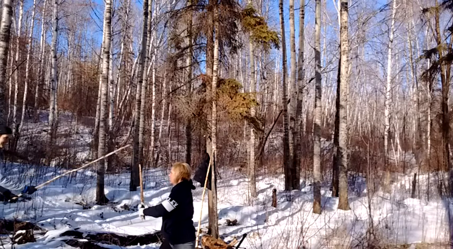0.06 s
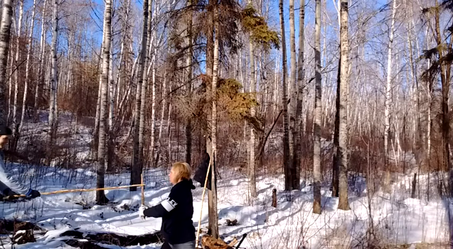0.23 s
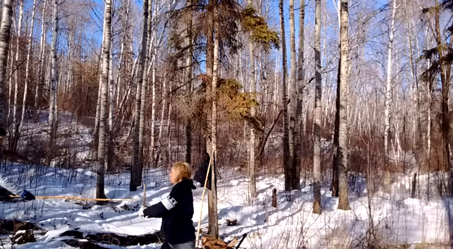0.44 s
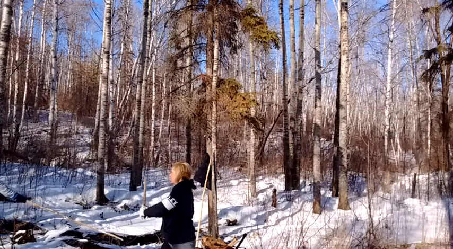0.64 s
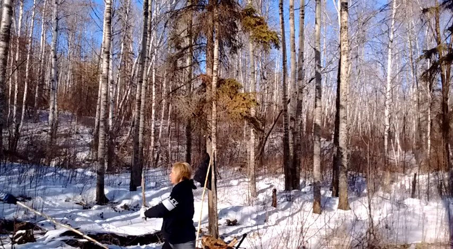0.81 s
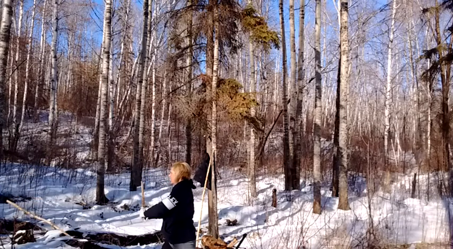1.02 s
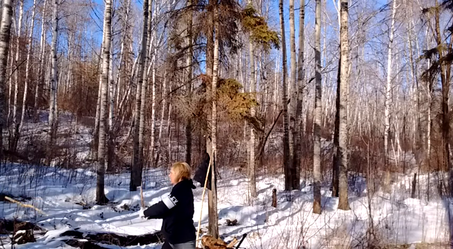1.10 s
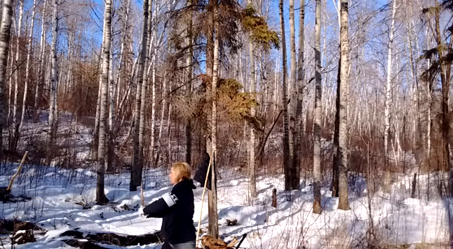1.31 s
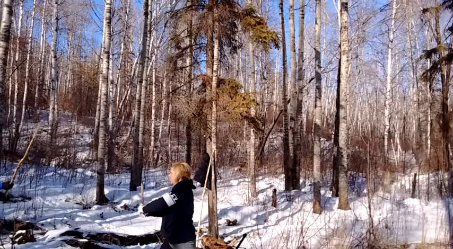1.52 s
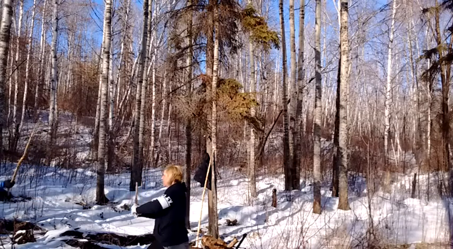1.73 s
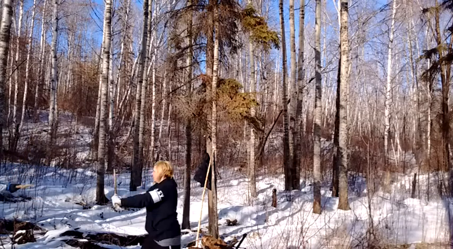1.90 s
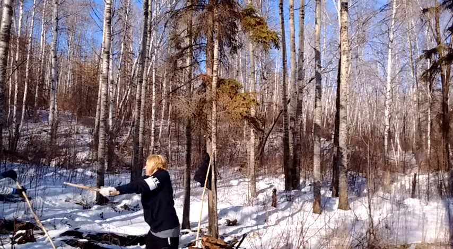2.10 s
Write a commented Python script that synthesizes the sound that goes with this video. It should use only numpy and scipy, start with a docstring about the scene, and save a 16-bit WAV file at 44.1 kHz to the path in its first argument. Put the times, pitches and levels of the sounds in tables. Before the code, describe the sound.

Wooden sticks smack sharply together once, rattle faintly, then soft snow crunches and cloth rustles outdoors

```python
"""One hard clack of wooden sticks, then a light chatter: two people spar in a snowy wood.
Each contact is a pair of band-limited pushes that excite the sticks' bending modes, with a noisy crack.
Trunks scatter the sound back as decaying noise; a whoosh leads the blow, jackets swish and snow crunches
in shaped noise, over a distant rumble, a faint hiss and an engine drone made of narrow noise bands.
The clack drives the recorder's gain control down, and the background creeps back."""
import sys
import numpy as np
from scipy import signal
from scipy.fft import rfft, irfft
from scipy.io import wavfile
from scipy.ndimage import uniform_filter1d, minimum_filter1d

SR = 44100
rng = np.random.default_rng(int(sys.argv[2]) if len(sys.argv) > 2 else 0)


def transcribe(u):
    """Save the signal u as a 16-bit wav file named by the first command-line argument.

    u: samples, shape (n,) or (channels, n), limited to [-1, 1]; the rate is SR.
    q: integer samples, one column per channel.
    """
    v = np.clip(np.atleast_2d(u).T, -1, 1)
    q = np.round(v * 32767).astype(np.int16)
    wavfile.write(sys.argv[1], SR, q)


N = 94815  # length in samples

# Levels are relative within their layer; left-right levels are positive towards the left.
# spectrum of distant rumble and hiss: (frequency [Hz], spectral density [dB])
AIR_SPECTRUM = [(25, -43), (50, -12), (110, -5.5), (200, 0), (320, 1.5), (480, -5), (700, -8.5),
                (1100, -16), (2100, -23.5), (2700, -28), (3100, -35.5), (3700, -29), (4800, -29),
                (5700, -35), (6400, -43), (7100, -32), (7900, -30.5), (10000, -34.5), (16000, -35)]
# stereo balance of the air: (frequency [Hz], left-right level [dB])
AIR_BALANCE = [(30, -31), (80, 9), (200, 11.5), (400, 2.5), (1000, 1.5), (3000, 1.5), (12000, 0)]
# likeness of the air at the two microphones: (frequency [Hz], correlation [1])
AIR_CORRELATION = [(30, 0.12), (120, 0.82), (400, 0.72), (1500, 0.7), (4000, 0.067), (15000, 0.073)]
AIR_DB = -41.5

# tones of a far-off engine: (frequency [Hz], level at the start [dB], growth [dB/s])
DRONE_TONES = [(66.7, -68, 0), (102.6, -67, 6), (135.3, -57, 1), (162, -59, -5), (200.5, -48.5, -4.5),
               (274.6, -57, 0), (302.7, -61.5, 3.5), (445.6, -59.5, 1)]
DRONE_WIDTH_HZ, DRONE_PAN_DB = 3.94, 12.5

# width of sound from all round, close microphones hearing its bass alike: (frequency [Hz], side level [dB])
DIFFUSE_WIDTH = [(200, -5), (800, -1), (1500, -12), (2200, -4), (2800, 1)]
# colour of the echoes from the trunks: (frequency [Hz], level [dB])
TRUNK_SPECTRUM = [(60, -30), (300, -26), (900, 1.5), (1300, -4.5), (1700, 7.5), (2200, 2.5), (3000, 8),
                  (4000, 9), (5000, 14), (6400, 10.5), (8000, 5), (15000, 5)]
# echoes of the nearest clumps of trees: (delay [s], half length [s], level against the even wood [dB])
CLUMPS = [(0.02, 0.0072, 8.5), (0.055, 0.012, -1)]
WOOD_DB, WOOD_T60_S, TRUNK_SPREAD_DB = -23.5, 0.95, 6.5
NEAR_DB, NEAR_T60_S = -19.5, .045

# swishes of jackets and sliding feet: (time of the top [s], half length [s], level [dB])
SWISHES = [(0.093, 0.3, -56.5), (1.787, 0.045, -47), (1.793, 0.0045, -51), (2.093, 0.18, -49)]
# colour of the swishes: (frequency [Hz], level [dB])
SWISH_SPECTRUM = [(300, 17.5), (1000, 8), (2000, 9.5), (3100, -3.5), (4600, 3.5), (6400, -7.5),
                  (8000, -1.5), (12000, -5.5), (16000, -9)]
SWISH_GRAIN_DB = 3.5

# crunches of snow crust:
# (time [s], level [dB], t60 [s], left-right level [dB], ring frequency [Hz], ring level [dB])
CRUNCHES = [(1.084, -54.5, 0.017, -3, 9400, 10), (1.2332, -31.5, 0.013, 15, 1390, 11),
            (1.237, -36, 0.021, -3, 9550, -3), (1.245, -45.5, 0.049, -1, 3970, 0),
            (1.261, -44.5, 0.018, -3, 9600, 3), (2.0175, -46, 0.039, 11, 8500, 2),
            (2.0343, -34, 0.0092, 5, 2380, 8), (2.035, -42, 0.032, -8, 8240, 14),
            (2.066, -44, 0.12, 1.5, 1790, 7), (2.145, -43.5, 0.067, 2.5, 5040, 11.5)]
# colour of the crunches: (frequency [Hz], level [dB])
CRUNCH_SPECTRUM = [(400, -14), (1400, 1), (2400, -0.5), (3100, -3.5), (4000, 6.5), (5100, 1.5),
                   (6400, -6.5), (8000, 5.5), (11000, 0), (15500, -7)]
CRUNCH_RISE_S, GRAIN_DB, CRUST_Q = 0.00068, 6, 6.2

# the swing before the blow: (time of the top [s], half length [s], level [dB])
SWING = (0.18, 0.037, -54.5)
# colour of the swing: (frequency [Hz], level [dB])
WHOOSH_SPECTRUM = [(60, -42), (150, -4), (260, 3), (450, 1), (900, -16), (3000, -61.5)]

# blows, one hard clack and then a light chatter:
# (time [s], level [dB], bass limit [Hz], treble limit [Hz], crack level [dB], crack t60 [s])
BLOWS = [(0.2212, 35, 100, 3410, -14, 0.014), (0.3552, 0, 1660, 3000, -3.5, 0.0082),
         (0.3569, 8, 3570, 6200, -10, 0.021), (0.3609, 2.5, 1850, 4600, -14, 0.019),
         (0.3644, 4, 1670, 2600, -14, 0.09)]
# dry snap that a stick radiates on contact: (frequency [Hz], level [dB])
SNAP_SPECTRUM = [(40, -73), (200, -30), (400, -22), (560, -4.5), (800, -16), (950, -1.5), (1250, -2),
                 (2100, -2.5), (2700, -18), (3300, -15), (4500, -4.5), (8000, -15), (15000, -41)]
# bending modes of the two sticks: (frequency [Hz], level [dB], t60 [s])
STICK_MODES = [(535, -22, .04), (955, -17, 0.1), (1152, -8.5, 0.045), (1390, -11, 0.03),
               (1617, -2.5, 0.053), (1844, -5.5, 0.056), (2003, -7, 0.041), (2300, -11, 0.032),
               (2650, -22, .06), (2930, -16, 0.039), (3580, -21.5, 0.035), (4500, -7, 0.04),
               (5200, -16, 0.06)]
# colour of the splintery crack: (frequency [Hz], level [dB])
CRACK_SPECTRUM = [(60, -33), (500, -3.5), (2000, 7.5), (3100, -2.5), (4600, 1.5), (6400, -12.5), (8000, 2),
                  (12000, -14.5), (16000, -24)]
# stereo balance of the sticks: (frequency [Hz], left-right level [dB])
STICK_BALANCE = [(500, 0), (1150, 4.5), (1700, 2.5), (2400, -1.5), (3300, 6), (5000, -2)]
RING_DB, CRACK_DB = -42, -5
REBOUND_S, REBOUND_DB = .00089, -6  # the second contact within each blow
RIGHT_LAG_S = .00009  # the left microphone hears the sticks first

# the recorder's stereo picture, wide in some bands and narrow in others: (frequency [Hz], side level [dB])
STEREO_WIDTH = [(1900, 0), (2400, 1.5), (3050, 10), (3600, 5), (4200, -2.5), (4850, -6), (5500, -2),
                (6300, 11), (7200, 0), (8200, -3), (10500, 1.5), (13000, 0)]
CEILING, RECOVER_DB_PER_S, TOP_HZ = 1, 11.5, 15700


def undb(db):
    """Level to amplitude: 20 dB is a factor of ten."""
    return 10 ** (np.asarray(db) / 20)


def unit(x):
    """Normalisation to a root-mean-square of 1."""
    return x / np.sqrt(np.mean(x ** 2))


def pan(db):
    """Intensity stereophony: half the level difference on each side, positive to the left."""
    return undb(np.array([[1], [-1]]) * db / 2)


def curve(points):
    """Interpolation of (Hz, value) points along log frequency, at every bin of a 2N spectrum."""
    hz, value = np.array(points, float).T
    bins_hz = np.fft.rfftfreq(2 * N, 1 / SR) + 1e-9
    return np.interp(np.log(bins_hz), np.log(hz), value)


def colour(x, points):
    """Minimum-phase filtering: a folded cepstrum makes the (Hz, dB) response causal."""
    cepstrum = irfft(np.log(undb(curve(points))))
    cepstrum[1:N] *= 2
    cepstrum[N + 1:] = 0
    response = np.exp(rfft(cepstrum))
    return irfft(rfft(x, 2 * N) * response)[..., :N]


def convolve(x, response):
    """Linear superposition: every sample launches a copy of the response."""
    return irfft(rfft(x, 2 * N) * rfft(response, 2 * N))[..., :N]


def fade(start, t60):
    """Exponential decay, falling 60 dB in t60 seconds from the start on."""
    age = np.arange(N) / SR - start
    return (age >= 0) * np.exp(-np.log(1000) * np.maximum(age, 0) / t60)


def swell(top, half, db):
    """Gaussian envelope: a smooth rise and fall around a moment."""
    return undb(db) * np.exp(-((np.arange(N) / SR - top) / half) ** 2 / 2)


def burst(start, t60):
    """Incoherent decay: noise drawn separately for each microphone, with a mean energy of 1."""
    return unit(rng.standard_normal((2, N)) * fade(start, t60)) / np.sqrt(N)


def widen(x, points):
    """Mid-side decomposition: the left-right difference is scaled by (Hz, dB) points."""
    mid = (x[0] + x[1]) / 2
    side = colour((x[0] - x[1]) / 2, points)
    return np.array([mid + side, mid - side])


def air():
    """Partial coherence: shared and separate noise mix from an alike rumble to a diffuse hiss."""
    shared = rfft(rng.standard_normal(2 * N))
    own = rfft(rng.standard_normal((2, 2 * N)))
    correlation = np.clip(curve(AIR_CORRELATION), 0, 1)
    both = np.sqrt(correlation) * shared + np.sqrt(1 - correlation) * own
    both = both * undb(curve(AIR_SPECTRUM)) * pan(curve(AIR_BALANCE))
    return undb(AIR_DB) * unit(irfft(both)[:, :N])


def drone():
    """Line broadening: engine tones waver on their long way through the trees, as narrow noise bands."""
    t, f = np.arange(N) / SR, np.fft.rfftfreq(N, 1 / SR)
    out = 0
    for hz, db, growth in DRONE_TONES:
        line = rfft(rng.standard_normal(N)) / (1 + ((f - hz) / DRONE_WIDTH_HZ) ** 2)
        out = out + undb(db + growth * t) * unit(irfft(line, N))
    return out * pan(DRONE_PAN_DB)


def forest(x):
    """Multiple scattering: nearby ground and bodies answer first, then clumps and countless trunks."""
    density = fade(.014, WOOD_T60_S) + sum(swell(*clump) for clump in CLUMPS)
    echoes = density * rng.standard_normal((2, N))
    spread = undb(TRUNK_SPREAD_DB * rng.standard_normal((2, N)))  # some trunks answer louder
    trunks = unit(echoes * spread) / np.sqrt(N)
    near_echo = burst(0.0059, NEAR_T60_S)
    response = undb(WOOD_DB) * colour(trunks, TRUNK_SPECTRUM) + undb(NEAR_DB) * near_echo
    return widen(convolve(x, response), DIFFUSE_WIDTH)


def jackets():
    """Friction noise: rubbing cloth and sliding feet give soft, grainy swells."""
    smooth = unit(uniform_filter1d(rng.standard_normal(N), size=60))
    grain = undb(SWISH_GRAIN_DB * smooth)
    rub = colour(grain * rng.standard_normal((2, N)), SWISH_SPECTRUM)
    return sum(swell(*swish) for swish in SWISHES) * unit(widen(rub, DIFFUSE_WIDTH))


def snow():
    """Brittle fracture: crust breaks in quick showers of tiny grains, each shower with its own resonance."""
    t, out = np.arange(N) / SR, 0
    grain_gain = undb(GRAIN_DB * rng.standard_normal(N))
    grains = unit(rng.standard_normal((2, N)) * grain_gain)
    for start, db, t60, pan_db, ring_hz, ring_db in CRUNCHES:
        rise = np.clip((t - start) / CRUNCH_RISE_S + 1, 0, 1)
        shower = grains * rise * fade(start - CRUNCH_RISE_S, t60)
        resonator = signal.iirpeak(ring_hz, CRUST_Q, fs=SR)
        ring = signal.lfilter(*resonator, shower + 1e-18)  # the offset avoids denormal numbers
        out = out + undb(db) * pan(pan_db) * (shower + undb(ring_db) * ring)
    return colour(out, CRUNCH_SPECTRUM)


def swing():
    """Aerodynamic noise: the stick pushes the air aside with a low whoosh, slightly to the right."""
    whoosh = unit(colour(rng.standard_normal(N), WHOOSH_SPECTRUM))
    return swell(*SWING) * whoosh * pan(db=-1)


def sticks():
    """Impact excitation: two pushes within a millisecond snap and ring the modes; the second cracks the bark."""
    t, f = np.arange(N) / SR, np.fft.rfftfreq(2 * N, 1 / SR)

    def late(seconds):
        """Pure delay: a phase that turns in proportion to frequency."""
        return np.exp(-2j * np.pi * f * seconds)

    push, crack = 0, 0
    rebound = 1 + undb(REBOUND_DB) * late(REBOUND_S)
    for start, db, low_hz, top_hz, crack_db, crack_t60 in BLOWS:
        contact = f ** 4 / (f ** 4 + low_hz ** 4) * np.exp(-(f / top_hz) ** 4)
        push = push + undb(db) * contact * late(start) * rebound
        crack = crack + undb(db + crack_db) * burst(start + REBOUND_S, crack_t60)
    stereo = np.array([push, push * late(RIGHT_LAG_S)]) * pan(curve(STICK_BALANCE))
    push = irfft(stereo)[:, :N]
    modes = sum(undb(db) * np.cos(2 * np.pi * hz * t) * fade(0, t60) for hz, db, t60 in STICK_MODES)
    snap = colour(push, SNAP_SPECTRUM)
    ring = undb(RING_DB) * convolve(push, modes)
    return snap + ring + undb(CRACK_DB) * colour(crack, CRACK_SPECTRUM)


def scene():
    """Superposition of the sparring pair, their echoes and the background."""
    near = sticks() + swing() + snow() + jackets()
    return near + forest(near) + air() + drone()


def record(dry):
    """Peak limiting: gain drops just ahead of a peak and recovers slowly; width is uneven, the top is cut."""
    wide = widen(dry, STEREO_WIDTH)
    over = 20 * np.log10(np.maximum(np.abs(wide).max(axis=0) / CEILING, 1))
    over = -minimum_filter1d(-over, size=301)  # looks ahead by half the window
    # a running maximum against a rising ramp lets the cut shrink at a steady rate in dB
    ramp = RECOVER_DB_PER_S * np.arange(N) / SR
    cut = np.maximum.accumulate(over + ramp) - ramp
    held = wide * undb(-uniform_filter1d(cut, size=151))
    low_pass = signal.ellip(8, .2, 80, TOP_HZ, fs=SR, output="sos")
    return signal.sosfilt(low_pass, held)


dry = scene()
out = record(dry)
transcribe(out)
```